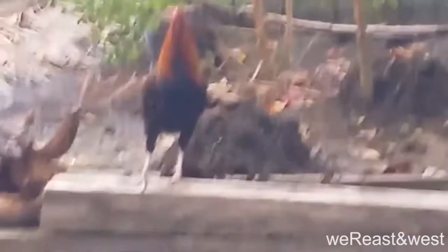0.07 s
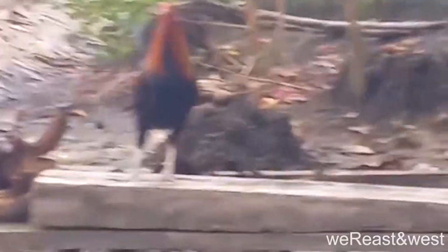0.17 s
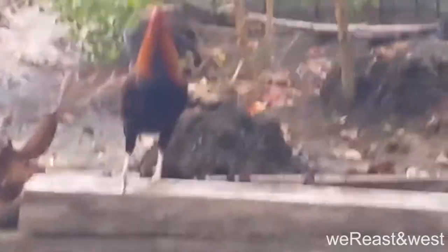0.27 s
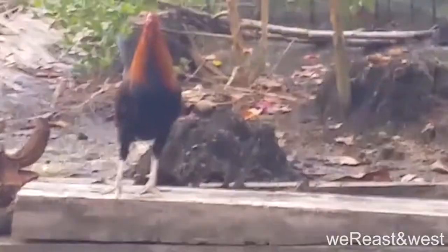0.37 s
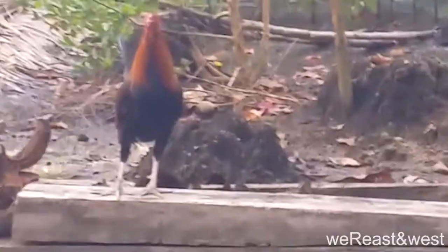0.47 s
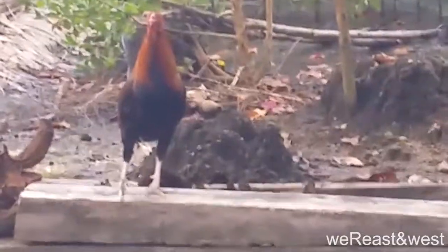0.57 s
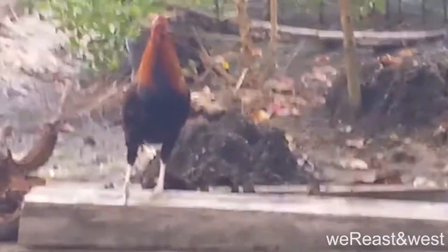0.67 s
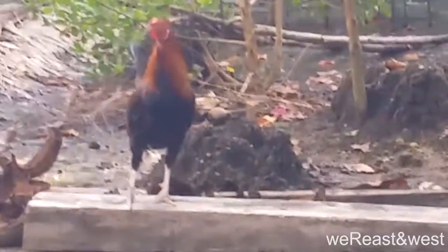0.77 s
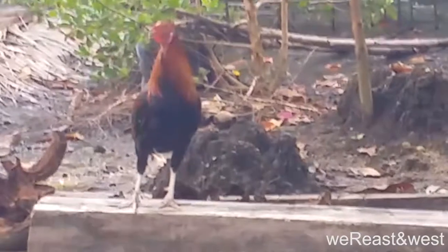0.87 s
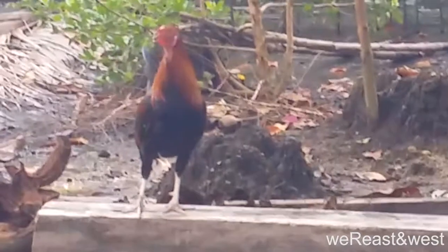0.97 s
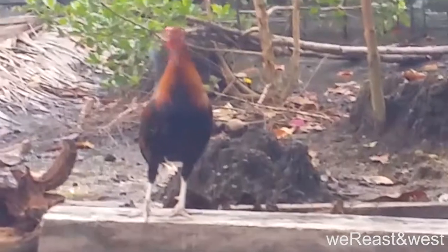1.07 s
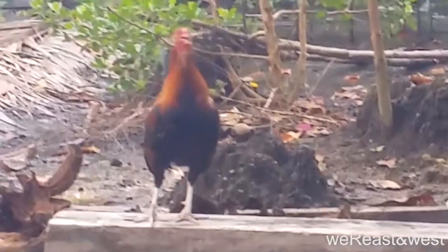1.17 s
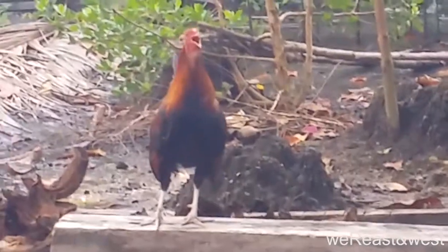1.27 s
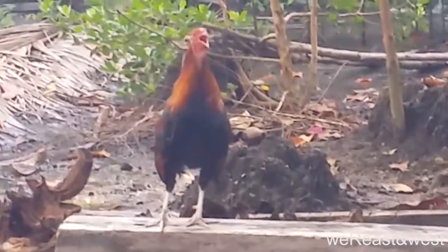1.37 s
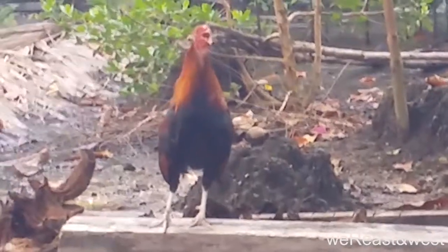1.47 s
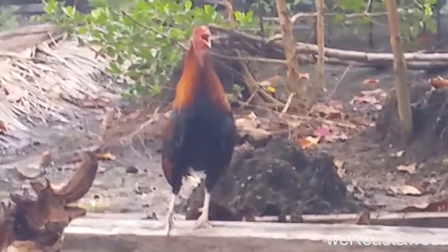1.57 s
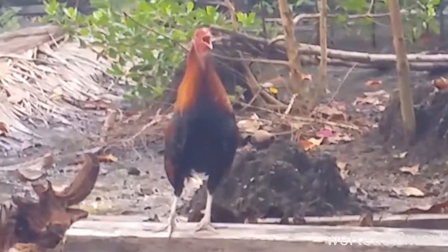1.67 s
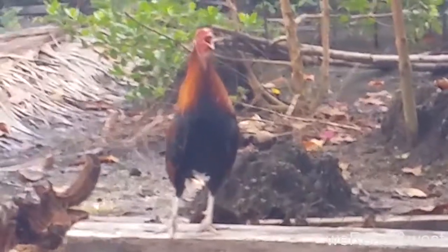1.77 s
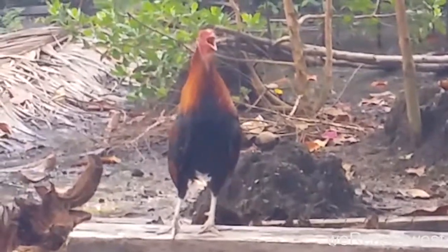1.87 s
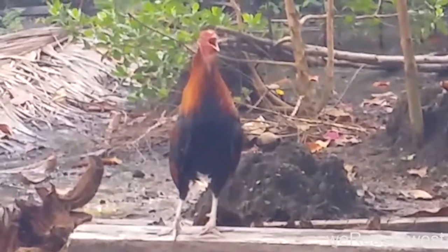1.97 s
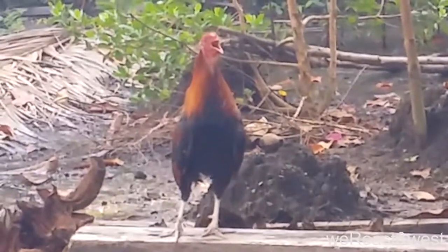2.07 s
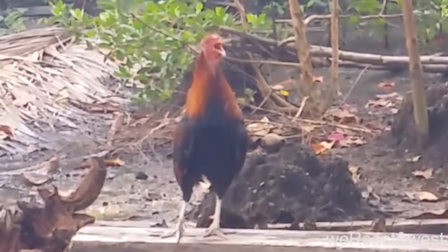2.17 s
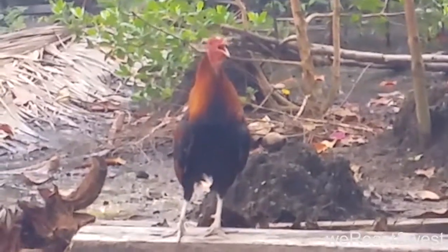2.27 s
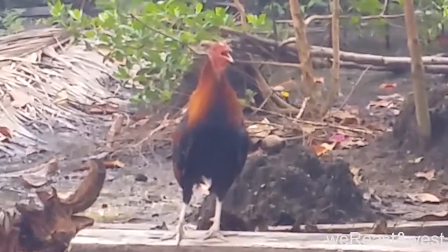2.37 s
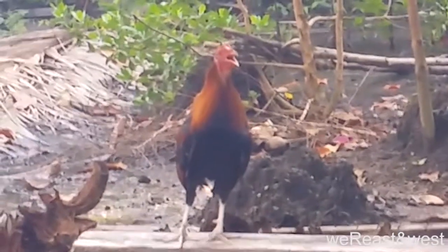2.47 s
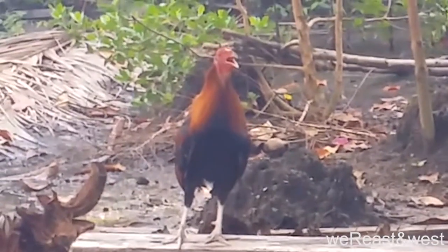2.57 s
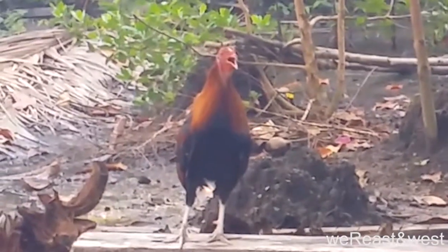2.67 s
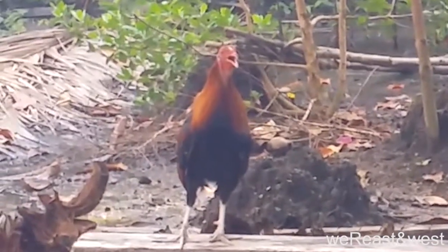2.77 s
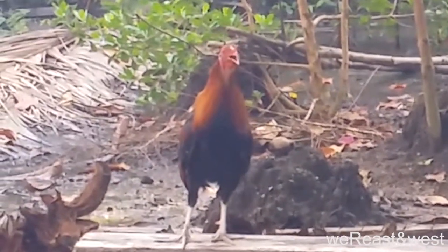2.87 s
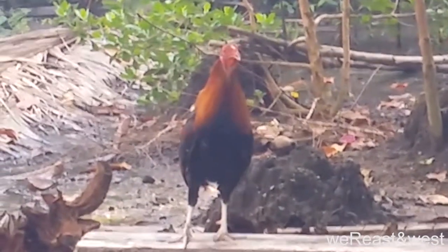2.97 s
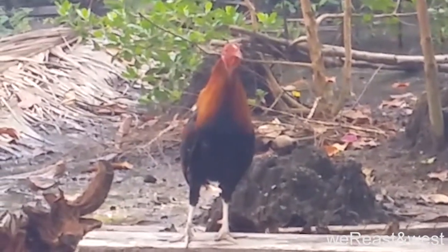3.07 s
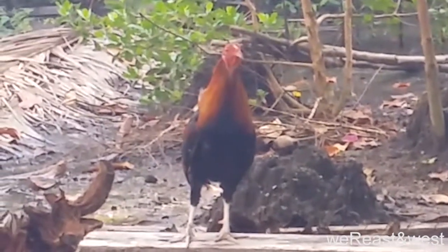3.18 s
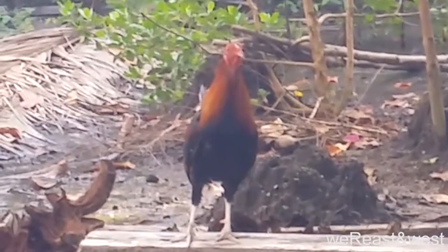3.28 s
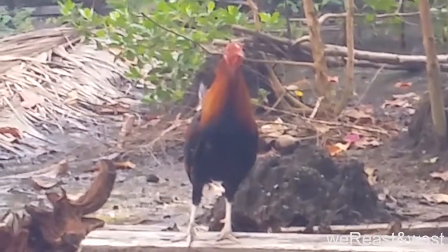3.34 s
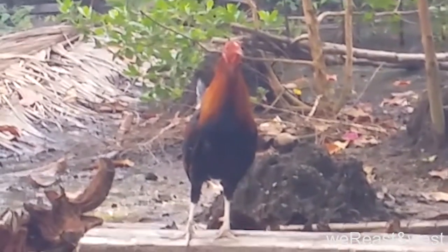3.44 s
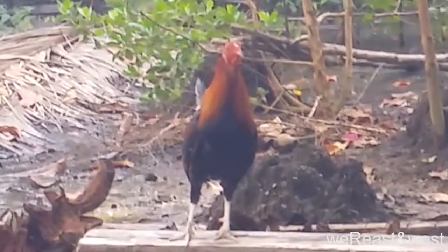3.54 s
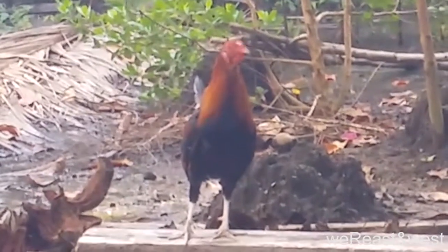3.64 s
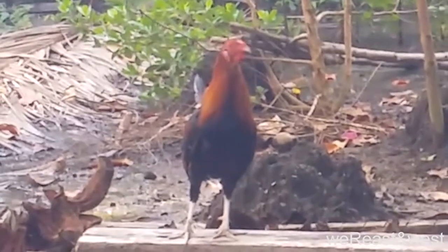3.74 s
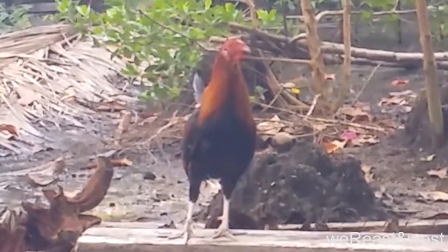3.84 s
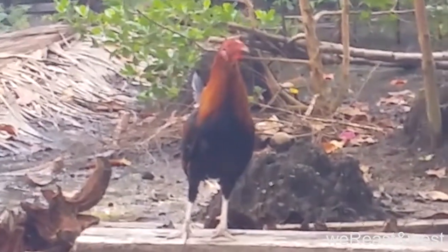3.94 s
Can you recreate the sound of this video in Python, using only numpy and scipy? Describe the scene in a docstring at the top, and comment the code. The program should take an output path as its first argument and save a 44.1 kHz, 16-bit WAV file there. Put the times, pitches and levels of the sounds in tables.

```python
"""A rooster crows once in a yard: a short note, a long high one, a rasp, and a last note that breaks and sinks.
Its voice is a sine sum led by the second partial, with weaker overtones, half-pitch lines and noisy pulse bursts.
Behind it an engine thuds (pulses through an exhaust resonance), a far bird chirps (gliding sines in echoes)
and the air hisses (filtered noise). A limiter and a soft clip flatten the loudest notes."""
import sys
import numpy as np
from scipy import signal
from scipy.fft import rfft, irfft
from scipy.io import wavfile
from scipy.ndimage import uniform_filter1d, minimum_filter1d

SR = 44100
rng = np.random.default_rng(int(sys.argv[2]) if len(sys.argv) > 2 else 0)


def digitize_waveform(pressure):
    """Quantize a signal to 16-bit integers and store it at the path in sys.argv[1].

    Rows of a 2-D input are taken as channels; values are limited to [-1, 1].
    """
    field = np.atleast_2d(pressure).T
    bounded = np.clip(field, -1, 1)
    quanta = np.round(bounded * 32767).astype(np.int16)
    wavfile.write(sys.argv[1], SR, quanta)


N = 176400
T = np.arange(N) / SR
HZ = np.fft.rfftfreq(2 * N, 1 / SR)
JITTER_HZ = 393.7  # rate limit of the fast pitch jitter
LEFT_LAG_MS = 0.2  # engine and air


def amp(db):
    """Decibels to gain."""
    return 10 ** (np.asarray(db) / 20)


def unit(x):
    """Scales to rms 1."""
    return x / np.sqrt(np.mean(x ** 2) + 1e-20)


def curve(rows, column=1):
    """One column of a time table, interpolated at every sample."""
    rows = np.array(rows)
    return np.interp(T, rows[:, 0], rows[:, column])


def read(points, hz):
    """A spectrum table, interpolated on a log-frequency axis."""
    table_hz, value = np.transpose(points)
    return np.interp(np.log(hz + 1), np.log(table_hz + 1), value)


def shape(x, gain):
    """Filters by a gain for each frequency."""
    return irfft(rfft(x, 2 * N) * gain)[..., :N]


def colour(x, points):
    """Minimum-phase filter: the resonances ring after what excites them."""
    cepstrum = irfft(np.log(amp(read(points, HZ))))
    causal = np.r_[cepstrum[:1], 2 * cepstrum[1:N]]
    return shape(x, np.exp(rfft(causal, 2 * N)))


def lowpass(x, cutoff_hz, order):
    """Zero-phase lowpass."""
    return shape(x, 1 / (1 + (HZ / cutoff_hz) ** order))


def delay(ms):
    """Phase turn of a short delay at each frequency."""
    return np.exp(-2j * np.pi * HZ * ms / 1000)


def drift(hz):
    """Random motion up to a given rate, rms 1."""
    return unit(shape(rng.standard_normal(N), 1 / np.sqrt(1 + (HZ / hz) ** 6)))


def pulses(rate_hz):
    """One click per cycle."""
    cycles = np.floor(np.cumsum(rate_hz) / SR)
    return np.diff(cycles, prepend=0)


def echoes(x, t60s):
    """Scattered reflections: decaying noise, different for each ear, each band dying at its own speed."""
    hz, t, z = signal.stft(rng.standard_normal((2, SR)), SR, nperseg=256)
    decay = amp(-60 * t / read(t60s, hz)[:, None])
    tail = signal.istft(z * decay * (t > 0), SR, nperseg=256)[1]
    tail = tail / np.linalg.norm(tail, axis=1, keepdims=True)
    return signal.fftconvolve(x[None], tail, axes=1)[:, :N]


def glide(start_s, length_s, from_hz, to_hz, level_db, jitter_share):
    """A short wavering tone that swells and fades as it slides."""
    u = np.clip((T - start_s) / length_s, 0, 1)
    hz = (from_hz + (to_hz - from_hz) * u) * (1 + jitter_share * drift(JITTER_HZ))
    swell = np.sqrt(2 * abs(np.sin(np.pi * u)))
    return amp(level_db) * swell * np.sin(2 * np.pi * np.cumsum(hz) / SR)


# hiss spectrum: freq_hz, relative_db
AIR_SPECTRUM = [(500, -10.5), (800, -2), (1300, -9.5), (2400, -8), (3400, -16), (8700, -19.5), (10500, -30),
                (14500, -30), (15500, -42)]
# hiss level: time_s, level_db
AIR_LEVEL = [(0, -39), (.4, -36.5), (1.2, -35.5), (1.3, -36.5), (3.1, -33), (3.58, -32), (3.61, -38),
             (4, -37)]
# left-right likeness: freq_hz, share_0_to_1
AIR_LIKENESS = [(400, 0.81), (1500, 0.11), (6000, 0.033)]


def air():
    """Faint outdoor hiss: noise, more alike between the ears at low frequencies, that swells and drops back."""
    a, b = rng.standard_normal((2, N))
    same = np.clip(read(AIR_LIKENESS, HZ), 0, 1)
    left = shape(a, delay(LEFT_LAG_MS))
    right = shape(a, same) + shape(b, np.sqrt(1 - same ** 2))
    highpass = HZ / np.hypot(HZ, 400)
    hiss = unit(shape(np.array([left, right]), amp(read(AIR_SPECTRUM, HZ)) * highpass))
    return hiss * amp(curve(AIR_LEVEL) + 0.47 * drift(12))


# far bird, before the direct/echo mix: start_s, length_s, from_hz, to_hz, level_db
CHIRPS = [(0.394, 0.056, 3610, 5410, -35), (0.454, 0.024, 5000, 6800, -30.5),
          (0.462, 0.062, 6950, 6690, -36.5), (0.762, 0.048, 3820, 4370, -41),
          (3.27, 0.017, 4800, 3760, -34)]
CHIRP_JITTER_SHARE, CHIRP_T60_S, CHIRP_DIRECT_GAIN = 0.0195, 0.74, 0.14


def bird():
    """Warbling glides, mostly heard as echoes among the trees."""
    song = sum(glide(*row, CHIRP_JITTER_SHARE) for row in CHIRPS)
    return CHIRP_DIRECT_GAIN * song + echoes(song, [(1, CHIRP_T60_S)])


# firing rate: time_s, rate_hz
ENGINE_RATE = [(0, 34), (.4, 34.3), (1.2, 34.3), (1.8, 32.6), (3.1, 31.7), (4, 32.4)]
# envelope of thud and rumble: time_s, gain_db
ENGINE_LEVEL = [(0.0, -19), (0.77, -13.5), (0.83, -15.5), (1.17, -15), (1.34, -16.5), (1.48, -14.5),
                (1.65, -18.5), (1.89, -16), (2.66, -21.5), (3.17, -11.5), (3.4, -16.5), (3.42, -12.5),
                (4.0, -22)]
# exhaust resonances: freq_hz, relative_db
EXHAUST = [(20, -58), (50, -42), (100, -11.5), (135, 7.5), (170, 0.5), (205, 2), (240, -13), (310, -14),
           (375, -19.5), (480, -22.5), (620, -69), (1200, -50), (6000, -120)]
# upper exhaust harmonics, above BITE_HZ: time_s, gain_db
BITE = [(0, 0.5), (1.2, 5.5), (1.35, -12), (2.5, -3.5), (3, -6), (4, 3)]
# rumble spectrum: freq_hz, relative_db
RUMBLE_SPECTRUM = [(20, -32.5), (45, -30), (65, -15), (95, -3.5), (130, 1), (180, -4.5), (330, -19.5),
                   (500, -25.5), (2000, -64)]
# rumble before the engine envelope: time_s, level_db
RUMBLE_LEVEL = [(0, -3.5), (1.2, -10.5), (1.45, -5.5), (4, -4.5)]
THUD_DB, PAN_DB, BITE_HZ = -2.5, 1, 196
RATE_JITTER_SHARE, MISFIRE_DB = .005, .9
SCATTER_HZ, SCATTER_T60_S, SCATTER_GAIN = 280, 0.3, .8  # echoes join above SCATTER_HZ


def engine():
    """Near-regular firings ring an exhaust, duller for a while as the engine slows, over a diffuse rumble."""
    rate_hz = curve(ENGINE_RATE) * (1 + RATE_JITTER_SHARE * drift(26.5))
    firings = pulses(rate_hz) * amp(MISFIRE_DB * drift(37))
    thud = amp(THUD_DB) * unit(colour(firings, EXHAUST))
    boom = lowpass(thud, BITE_HZ, 8)
    thud = boom + amp(curve(BITE)) * (thud - boom)
    clatter = thud - lowpass(thud, SCATTER_HZ, 16)
    thud = thud + SCATTER_GAIN * echoes(clatter, [(1, SCATTER_T60_S)])[0]
    noise = rng.standard_normal(N) + 0.18 * rng.standard_normal((2, N))  # shared + per ear
    rumble = amp(curve(RUMBLE_LEVEL)) * unit(colour(noise, RUMBLE_SPECTRUM))
    ears = np.array([amp(PAN_DB / 2) * delay(LEFT_LAG_MS), amp(-PAN_DB / 2) * delay(0)])
    return shape((thud + rumble) * amp(curve(ENGINE_LEVEL)), ears)


def gate(rows):
    """Opens quickly at a note's start and shuts at its end."""
    opening = np.clip((T - rows[0][0]) / .002, 0, 1)
    closing = np.clip((rows[-1][0] - T) / .007 + 1, 0, 1)
    return opening * closing


def effort(rows):
    """Loudness of a note over time."""
    return gate(rows) * amp(curve(rows, column=2))


# bursts of irregular beating in the voice membranes, before RASP_GAIN_DB: start_s, length_s, level_db
RASPS = [(1.215, 0.0063, -16), (1.353, 0.027, -17.5), (1.5, 0.013, -19), (1.647, 0.2, -33),
         (1.907, 0.035, -16.5), (1.97, .11, -22), (2.119, 0.013, -16), (2.15, 0.095, -22),
         (2.253, 0.014, -18), (2.795, 0.023, -27)]
# throat resonances: freq_hz, relative_db
THROAT = [(300, -58), (580, -48), (790, 7), (1100, -3.5), (1350, 9), (1600, -6.5), (1950, 6.5), (2220, -5),
          (2500, 9), (3000, -16), (3550, 3), (4400, -47), (6100, -17), (7200, -17.5), (15000, -37.5)]
RASP_GAIN_DB, BREATH_DB = 3.5, -35  # breath: relative to note effort
RASP_ATTACK_S, RASP_RELEASE_S = .003, 0.024
RASP_RATE_HZ, RASP_SCATTER_LOG = 660, .25  # median rate, rms scatter of its natural log
RASP_FLUTTER_HZ, RASP_FLUTTER_DB, RASP_AIR_GAIN = 99, 3.6, .25


def rasp():
    """Uneven pulses and air ring the throat: faintly under every note, loudly in bursts."""
    beats = pulses(RASP_RATE_HZ * np.exp(RASP_SCATTER_LOG * drift(JITTER_HZ)))
    drive = unit(beats - beats.mean()) + RASP_AIR_GAIN * rng.standard_normal(N)
    drive = drive * amp(RASP_FLUTTER_DB * drift(RASP_FLUTTER_HZ))
    level = amp(BREATH_DB) * sum(effort(rows) for rows in (FIRST, LONG, LAST, SINK))
    for start_s, length_s, level_db in RASPS:
        attack = np.clip((T - start_s) / RASP_ATTACK_S, 0, 1)
        release = np.exp(-np.maximum(T - start_s - length_s, 0) / RASP_RELEASE_S)
        level = np.maximum(level, amp(level_db + RASP_GAIN_DB) * attack * release)
    return unit(colour(drive, THROAT)) * level


# voice roughness: time_s, half_pitch_lines_db, overtones_db, pitch_jitter_share
VOICE = [(1.24, -11, -4, 0.0028), (1.34, -9, -3.5, 0.0018), (1.38, 8, -3, .015), (1.52, -27, 1, 0.0056),
         (1.85, -20, 1, 0.0072), (1.895, 11, -7.5, 0.0053), (1.93, 4, -6, 0.012), (2.12, -10, -4, .014),
         (2.3, -12, -7.5, 0.0058), (2.33, 2, -4, 0.005), (2.62, 5, -1.5, 0.0046), (2.68, 3.5, 0, 0.013),
         (2.75, -4.5, 1, .002), (2.8, -18.5, 7.5, 0.043)]
# period doubles again as the last note breaks: time_s, quarter_pitch_lines_db
QUARTER_LINES = [(2.59, -40), (2.615, -10), (2.7, -8.5), (2.74, -19), (2.8, -13)]
# warble of the long note: time_s, pitch_share
WARBLE = [(1.865, 0), (1.88, .013), (2.07, .013), (2.085, 0)]
WARBLE_HZ = 42.2
WOBBLE_SHARE, WOBBLE_HZ = 0.00407, 53  # slower pitch drift
SHIMMER_SHARE, SHIMMER_HZ = .13, 85  # level drift
FLICKER_DB, FLICKER_HZ = 2, 37  # per-partial level drift


def clear_note(rows, overtones):
    """Sine partials: the strong second, flickering overtones, half- and quarter-pitch lines between them."""
    on = gate(rows) > 0
    warble = curve(WARBLE) * np.cos(2 * np.pi * WARBLE_HZ * (T - WARBLE[1][0]))
    hz = curve(rows) / 2 * (1 + warble)  # fundamental
    jitter = curve(VOICE, column=3) * drift(JITTER_HZ)
    turns = np.cumsum(hz * (1 + jitter + WOBBLE_SHARE * drift(WOBBLE_HZ))) / SR
    half = amp(curve(VOICE)[on])
    quarter = amp(curve(QUARTER_LINES)[on])
    bright = amp(curve(VOICE, column=2)[on])
    flicker_db = FLICKER_DB * drift(FLICKER_HZ)
    out = np.zeros(N)
    for k in np.arange(2, 66) / 4:  # partial number, in quarters
        if k % .5:
            share = quarter
        elif k % 1:
            share = half
        else:
            share = 1
        partial_flicker_db = np.roll(flicker_db, rng.integers(N))[on]
        gain = share * bright * amp(read(overtones, k * hz[on]) + partial_flicker_db)
        if k == 2:
            gain = 1
        out[on] += gain * np.sin(2 * np.pi * (k * turns[on] + rng.random()))
    return np.sqrt(2) * effort(rows) * (1 + SHIMMER_SHARE * drift(SHIMMER_HZ)) * out


# notes, before VOICE_GAIN_DB: time_s, second_partial_hz, second_partial_db
FIRST = [(1.24, 1848, -6), (1.252, 1859, -2), (1.29, 1880, -3.5), (1.334, 1850, -2), (1.372, 1777, -15)]
LONG = [(1.515, 1925, -21), (1.525, 1940, 0), (1.541, 2150, -14), (1.589, 2115, -8.5), (1.603, 2029, -14),
        (1.643, 1904, -11), (1.813, 1942, -10.5), (1.827, 2048, -8.5), (1.843, 1930, 0), (1.857, 2167, -8),
        (1.865, 2046, -9.5), (1.981, 2090, -5), (2.071, 2039, -12.5), (2.085, 1948, -8), (2.135, 1920, -14)]
LAST = [(2.272, 1818, -13), (2.294, 1884, 0.5), (2.322, 2030, -14.5), (2.386, 1942, -14),
        (2.404, 2018, -16), (2.474, 2006, -15.5), (2.596, 1965, -19)]
SINK = [(2.6, 1875, -13), (2.616, 1846, -16), (2.64, 1805, -17), (2.72, 1765, -14), (2.766, 1754, -14),
        (2.8, 1674, -17.5)]
# overtones, throat wide / narrowed / closing as it sinks: freq_hz, db_re_second_partial
WIDE = [(500, -51), (1000, -17), (1500, -25.5), (2400, -1.5), (3000, -31.5), (3800, -16), (4500, -40),
        (5600, -24), (7000, -32), (8700, -32.5), (9600, -30.5), (10600, -40), (15000, -49)]
NARROW = [(500, -38.5), (1000, -24.5), (1500, -13), (2500, -14.5), (3000, -29), (4000, -34.5), (5000, -30),
          (5600, -51), (7050, -16.5), (7550, -23), (8050, -25), (10000, -53), (11500, -42), (15000, -43)]
SUNK = [(450, -40), (660, -20), (880, -13), (1550, -13.5), (1960, -2.5), (2060, 7), (2200, -17.5),
        (3300, -39), (5600, -39), (7100, -19), (10000, -45), (15000, -44)]
# fundamental swooping at note edges: start_s, length_s, from_hz, to_hz, level_db
SWOOPS = [(1.228, 0.026, 683.5, 902, -11), (1.33, 0.05, 870, 795, -17), (1.505, 0.021, 717, 934, -18),
          (2.246, 0.0423, 697, 858, -17.5), (2.783, 0.031, 860, 668, -16)]
# voice cracks before the first and last notes: start_s, length_s, from_hz, to_hz, level_db
SQUEAKS = [(1.216, 0.0084, 2616, 2530, -12), (2.261, 0.019, 2600, 2410, -21)]
# second membrane's own pitch in rough patches: start_s, length_s, from_hz, to_hz, level_db
SIDE_TONES = [(1.353, 0.1, 1392, 1294, -24.5), (1.897, 0.16, 2350, 2366, -12.5),
              (2.108, 0.1733, 1319, 1389, -24), (2.14, 0.114, 2014, 1950, -16.5)]
# stereo balance: freq_hz, left_minus_right_db
BALANCE = [(800, 2.5), (1050, 4.5), (1400, 3), (1760, 6), (1870, 0.5), (1950, 1), (2120, -14), (2300, -5.5),
           (2700, -10), (3500, -6), (4700, 9), (7000, 19.5), (7800, -2), (15000, 6)]
# yard reverberation: freq_hz, t60_s
YARD_T60 = [(200, 0.13), (1000, 0.46), (2000, 0.6), (7000, 0.77), (15000, 0.04)]
VOICE_GAIN_DB, LEFT_LEAD_MS = 4.5, 0.077
SWOOP_JITTER_SHARE, SIDE_JITTER_SHARE = 0.0247, .03
YARD_DB, NEAR_DB, NEAR_T60_S = -12, -14, .16


def rooster():
    """The crow, reaching the left microphone first, with short near echoes and longer ones round the yard."""
    clear = (clear_note(FIRST, NARROW) + clear_note(LONG, WIDE)
             + clear_note(LAST, NARROW) + clear_note(SINK, SUNK))
    crow = amp(VOICE_GAIN_DB) * clear + rasp()
    crow = crow + sum(glide(*row, SWOOP_JITTER_SHARE) for row in SWOOPS + SQUEAKS)
    crow = crow + sum(glide(*row, SIDE_JITTER_SHARE) for row in SIDE_TONES)
    lean = amp(read(BALANCE, HZ))
    ears = np.array([lean, delay(LEFT_LEAD_MS)]) * 2 / (1 + lean)
    near = crow + amp(NEAR_DB) * echoes(crow, [(1, NEAR_T60_S)])
    return shape(near, ears) + amp(YARD_DB) * echoes(crow, YARD_T60)


def scene():
    """Everything in the yard."""
    return air() + bird() + engine() + rooster()


LIMIT_S, CEILING_DB, KNEE_POWER, EDGE_HZ = 0.02, 4.5, 10, 15600


def record(dry):
    """A fast limiter holds the loudest notes, a soft clip flattens their peaks, a lowpass limits the band."""
    size = max(int(LIMIT_S * SR), 1)
    peak = -minimum_filter1d(-abs(dry).max(0), size)
    reduction = uniform_filter1d(np.maximum(peak / amp(CEILING_DB), 1), size)
    held = dry / reduction
    flat = held / (1 + abs(held) ** KNEE_POWER) ** (1 / KNEE_POWER)
    band = signal.firwin(511, EDGE_HZ, window=("kaiser", 9), fs=SR)
    return signal.oaconvolve(flat, band[None], "same")


dry = scene()
out = record(dry)
digitize_waveform(out)
```